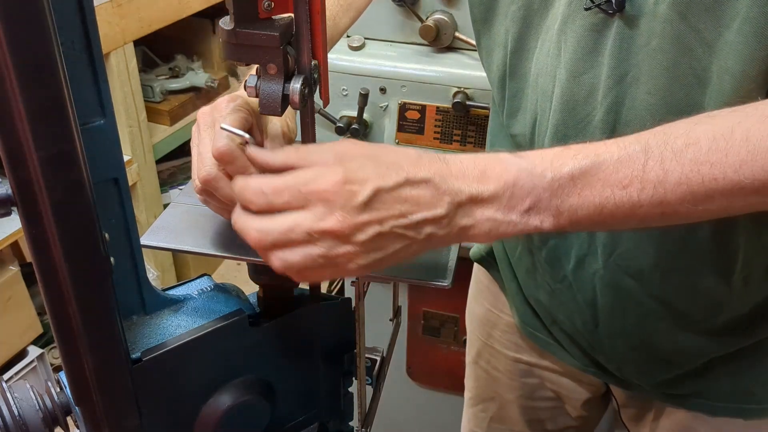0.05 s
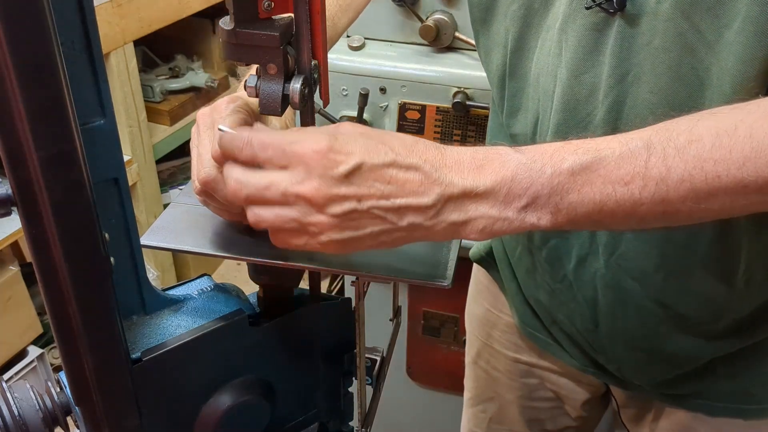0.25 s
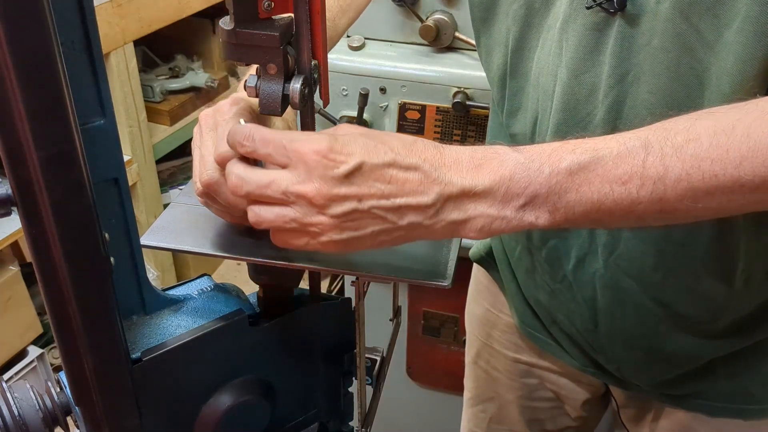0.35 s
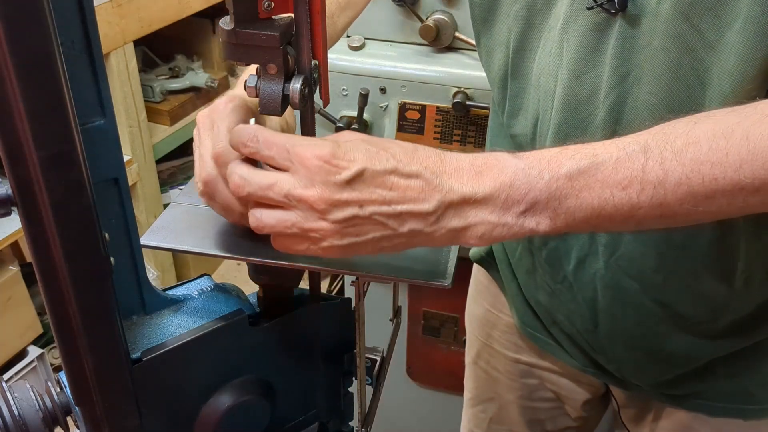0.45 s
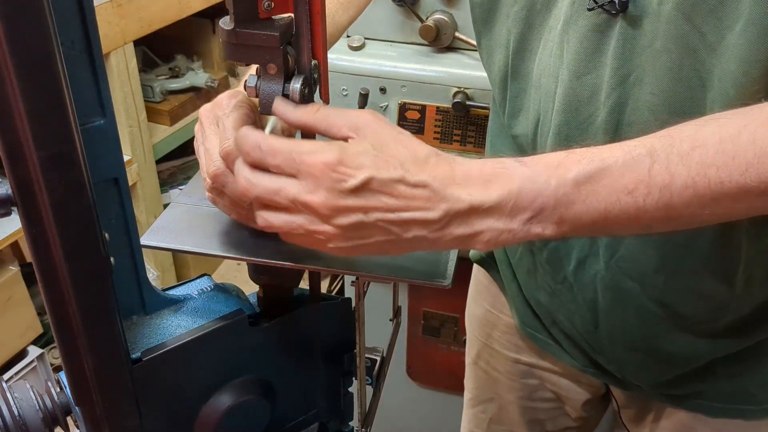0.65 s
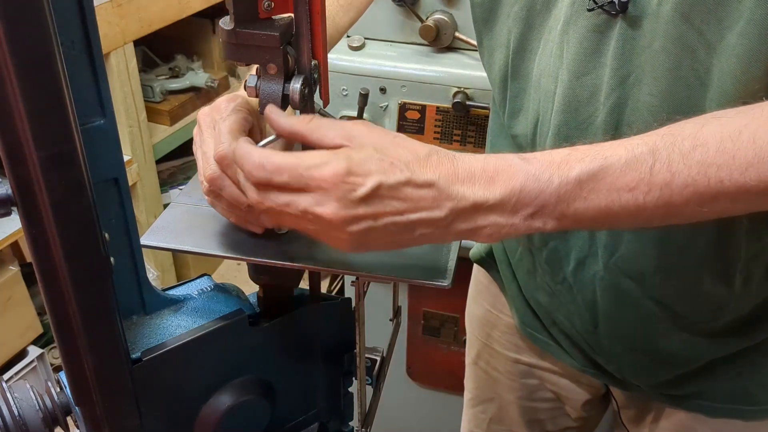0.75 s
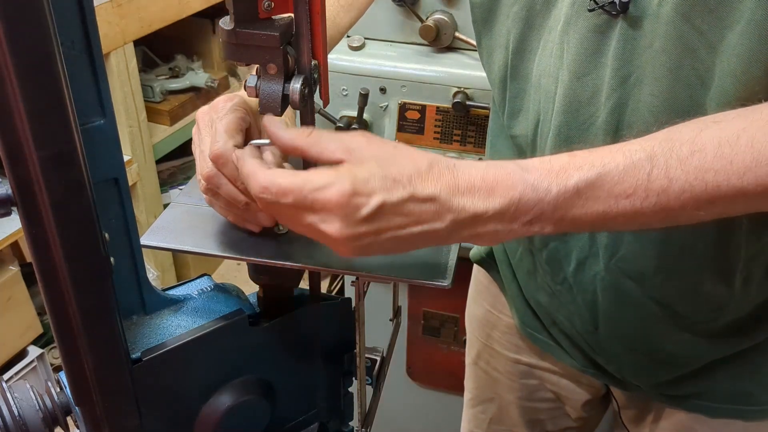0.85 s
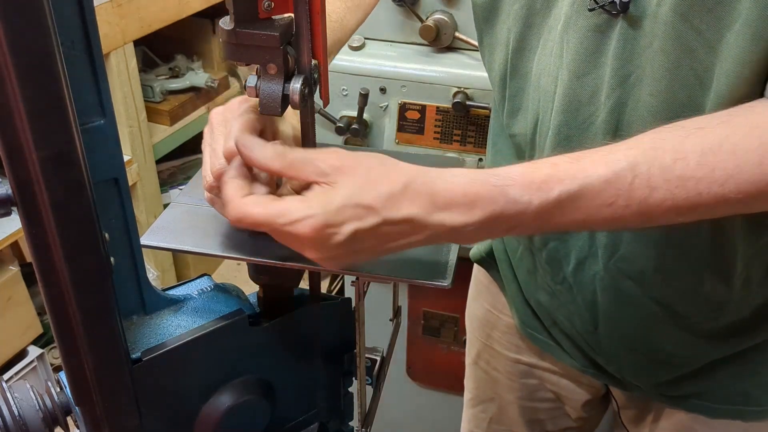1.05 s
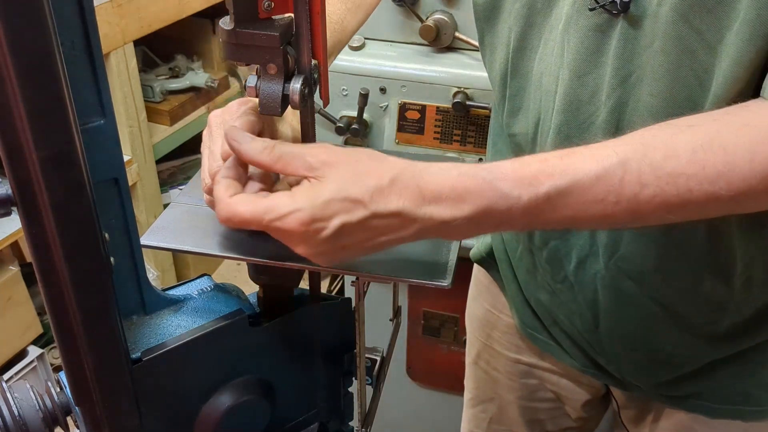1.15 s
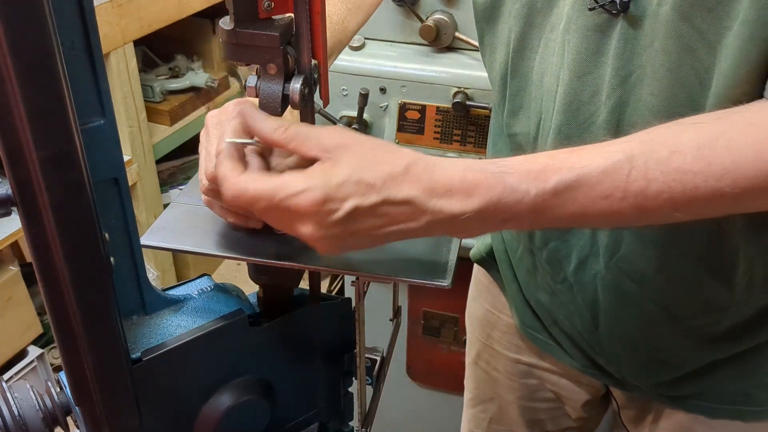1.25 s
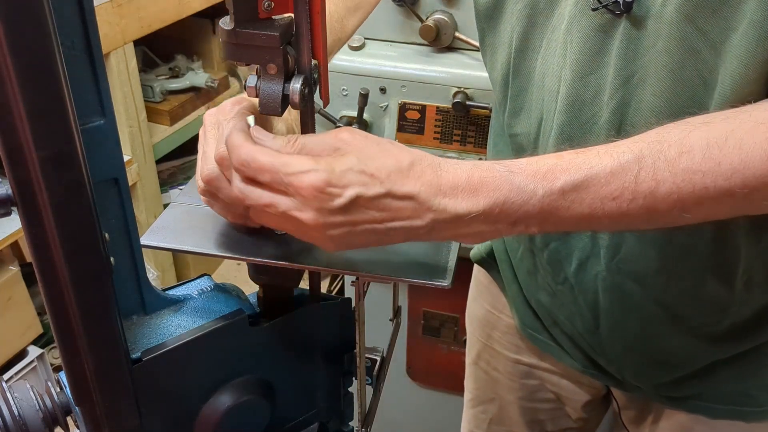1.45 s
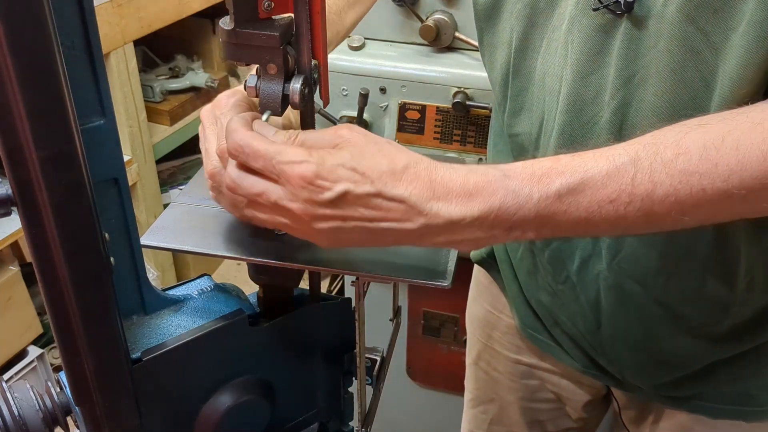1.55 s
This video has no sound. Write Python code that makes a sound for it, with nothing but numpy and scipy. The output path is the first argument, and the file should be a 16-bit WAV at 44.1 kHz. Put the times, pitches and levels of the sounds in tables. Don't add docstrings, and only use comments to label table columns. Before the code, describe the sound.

A thin steel rod clinks and scrapes in a steel plate, close up in a small workshop. Faint scraping opens; near 0.2 seconds a dull bench knock meets a cluster of low microphone thumps, leaving cloth rumble that fades by about 1. A light tick sounds at 0.88. Two hard, bright clinks ring at 1.23 and 1.27 with a hollow boom, then scraping and small taps.

```python
import sys
import numpy as np
from scipy import signal
from scipy.fft import rfft, irfft
from scipy.io import wavfile
from scipy.ndimage import uniform_filter1d

SR = 44100
rng = np.random.default_rng(int(sys.argv[2]) if len(sys.argv) > 2 else 0)


def dump(signal):
    limited = np.clip(np.atleast_2d(signal).T, -1, 1)
    pcm = np.round(limited * 32767).astype(np.int16)
    wavfile.write(sys.argv[1], SR, pcm)


def linear_from_db(decibels):
    return 10 ** (np.asarray(decibels, float) / 20)


N = 70560

ROD_PITCHES = [1125, 1513, 1961, 1983, 2420, 2600, 2929, 3714, 3960, 4660, 4791, 5620, 5803, 6918]
PLATE_PITCHES = [800, 832, 885, 925, 1168, 1210, 1290, 1420, 2420, 2640, 3570, 3720, 3960, 5800]
BENCH_PITCHES = [576, 707, 790, 880, 1163, 1289, 1430, 1507, 1970, 2330, 2422, 2632, 3962]
# level_db, t60_s
ROD_MODES = [(-13.5, 0.13), (-5.5, 0.13), (-3.5, 0.21), (-10.5, 0.61), (-3, 0.12), (-8, 0.17), (-2, 0.16),
             (-18.5, 0.072), (-7, .14), (-13, 0.21), (-5.5, 0.059), (-14.5, 0.18), (-2, .09), (-33, 0.25)]
PLATE_MODES = [(-5.5, 0.15), (6.5, 0.097), (-10.5, 0.22), (-6.5, 0.3), (8.5, 0.062), (-15, .08), (1, 0.086),
               (-10.5, 0.053), (-18.5, 0.089), (-7.5, 0.083), (-21.5, 0.16), (-12, 0.11), (-9, 0.13),
               (-49.5, 0.055)]
BENCH_MODES = [(-16.5, 0.21), (-13, 0.05), (-3, 0.15), (7.5, 0.11), (-8.5, .13), (-3, .15), (-11, 0.065),
               (-11, .1), (-33.5, .2), (-27.5, 0.24), (-19.5, .1), (-22.5, .08), (-47, .08)]
# start_s, rod_db, plate_db, bench_db, crack_db
TAP_EVENTS = [(.003, -86.5, -75, -70.5, -70), (.078, -103, -86, -82.5, -66), (.086, -91.5, -85, -68, -92.5),
              (.196, -92.5, -79, -41, -60), (.807, -100, -83.5, -86, -88),
              (.8396, -94, -54.5, -89.5, -64.5), (.884, -79.5, -44.5, -64.5, -53.5),
              (1.0875, -100, -86.5, -88.5, -85), (1.1688, -106, -87.5, -65.5, -80.5),
              (1.2340, -33.5, -31, -43, -27), (1.2702, -27, -45.5, -64, -21),
              (1.4028, -99.5, -72, -59, -49), (1.526, -82.5, -59.5, -56, -45),
              (1.593, -77, -60.5, -58, -49)]
# frequency_hz, level_db
CRACK_COLOUR = [(250, -38.5), (500, -0.5), (900, 2), (2000, -6), (2800, -1.5), (4500, -9.5), (6000, -12),
                (7300, -36.5)]
# frequency_hz, level_db_per_hz
THUD_COLOUR = [(350, -21.5), (600, -5), (900, -4), (1400, -3.5), (1800, -12), (2500, -23), (4000, -38),
               (5000, -45.5)]
# time_s, friction_db, brightness_db, depth_db
SCRAPE_COURSE = [(0, -81, -4, 2.5), (.09, -63.5, -5.5, 6.5), (.19, -69.5, -3.5, -1), (.3, -80, -23, -0.5),
                 (.495, -94, -22, -16.5), (.515, -69.5, -31, -12), (.56, -68, -39, -8),
                 (.64, -77, -32, -20.5), (.66, -93.5, -36, -26.5), (.79, -100, -33, -24),
                 (.812, -68, 1, -24), (.98, -76, -7.5, -29.5), (1.04, -82, -18, -18.5),
                 (1.07, -67, -13.5, -14), (1.16, -62.5, -12.5, -7.5), (1.22, -57.5, -13, 1),
                 (1.45, -72.5, -9.5, -7.5), (1.6, -59.5, -21, 0)]
# pitch_hz, width_hz, level_db
SCRAPE_RESONANCES = [(599, 90, -5.5), (738.6, 23, 2), (836, 64, -2.5), (916, 29, -7), (1207, 81, -4),
                     (1404, 160, -4.5), (2210, 200, -31), (4230, 150, -41.5)]
# start_s, level_db
PLATE_HUMS = [
    (.2, -74.5),
    (.884, -65),
    (1.06, -85.5),
    (1.16, -77),
    (1.53, -61.5),
]
# start_s, level_db
BENCH_BOOMS = [
    (0.21, -55),
    (.08, -76.5),
    (2.6, -78),
    (1.2597, -46.5),
    (1.53, -84.5),
]
# centre_s, level_db, pitch_hz, length_s, direction (+1 push, -1 pull)
MIC_THUMPS = [
    (.210, -33, 30, 0.0054, 1),
    (0.2306, -16, 85, 0.0056, -1),
    (0.2517, -18, 95, 0.0034, 1),
    (0.2632, -18, 110, 0.0025, 1),
    (0.291, -25.5, 35, 0.013, -1),
    (0.337, -19.5, 70, 0.0041, 1),
    (0.363, -33.5, 65, .015, 1),
    (0.623, -31, 38, 0.011, 1),
    (0.742, -44, 70, 0.0073, -1),
]
# time_s, level_db
RUMBLE_COURSE = [(0.0, -64), (0.114, -78), (0.172, -53), (0.32, -43), (0.378, -42), (0.444, -47.5),
                 (0.708, -48.5), (0.802, -51), (1.068, -65), (1.224, -70), (1.6, -69)]
# frequency_hz, level_db_per_hz
RUMBLE_SPECTRUM = [(18, -2), (30, 2.5), (50, -9), (90, -22), (160, -33), (300, -52.5), (500, -62.5)]
# frequency_hz, t60_s
ROOM_DECAY = [(150, 0.3), (400, 0.37), (1000, 0.24), (3000, 0.2), (7000, 0.18)]


def colour(x, table):
    points = np.array(table, float)
    hz = np.fft.rfftfreq(len(x), 1 / SR) + 1
    level_db = np.interp(np.log(hz), np.log(points[:, 0]), points[:, 1], left=-90, right=-90)
    return irfft(rfft(x) * linear_from_db(level_db), len(x))


def unit(x):
    return x / np.sqrt(np.mean(x ** 2))


def band(x, lo_hz, hi_hz):
    return signal.sosfilt(signal.butter(2, [lo_hz, hi_hz], "band", fs=SR, output="sos"), x)


def curve(table, column):
    points = np.array(table, float)
    return np.interp(np.arange(N) / SR, points[:, 0], points[:, column])


def decay(t, t60_s):
    return np.exp(-np.log(1000) * t / t60_s)


def ring(pitches, modes, contact_s, rattle_db):
    t = np.arange(SR // 2) / SR
    hold = int(SR / 110)
    steps = rng.standard_normal((len(pitches), len(t) // hold + 1))
    flutter = uniform_filter1d(np.repeat(steps, hold, axis=1), hold, axis=1)[:, :len(t)]
    out = np.zeros(len(t))
    for hz, (level_db, t60_s), wobble in zip(pitches, modes, flutter):
        out += linear_from_db(level_db + rattle_db * wobble) * np.sin(2 * np.pi * hz * t) * decay(t, t60_s)
    attack = np.sin(np.pi / 2 * np.minimum(t / contact_s, 1)) ** 2
    return out * attack


def taps():
    hard_db, hard_contact_s, soft_contact_s, bench_contact_s = -40, 0.0012, 0.0022, 0.009
    crack_t60_s, reflection_s, reflection_db = 0.046, 0.0038, -3
    t = np.arange(SR // 2) / SR
    rings = np.zeros(N + SR)
    noise = np.zeros((2, N + SR))
    for start_s, rod_db, plate_db, bench_db, crack_db in TAP_EVENTS:
        soft = int(crack_db < hard_db)
        contact_s = soft_contact_s if soft else hard_contact_s
        rod = linear_from_db(rod_db) * ring(ROD_PITCHES, ROD_MODES, contact_s, 1.0)
        plate = linear_from_db(plate_db) * ring(PLATE_PITCHES, PLATE_MODES, contact_s, 2.0)
        bench = linear_from_db(bench_db) * ring(BENCH_PITCHES, BENCH_MODES, bench_contact_s, 2.0)
        burst = decay(t, crack_t60_s) * np.minimum(t / contact_s, 1)
        first, second = rng.standard_normal((2, len(t))) * burst
        i, late = int(start_s * SR), int((start_s + reflection_s) * SR)
        rings[i:i + len(t)] += rod + plate + bench
        noise[soft, i:i + len(t)] += linear_from_db(crack_db) * first
        noise[soft, late:late + len(t)] += linear_from_db(crack_db + reflection_db) * second
    cracks = linear_from_db(9) * colour(noise[0], CRACK_COLOUR) + linear_from_db(18) * colour(noise[1], THUD_COLOUR)
    return np.array([rings, cracks])[:, :N]


def scrape():
    slips_per_s, slip_spread_db = 1200, 5
    chance, side, size = rng.random((3, N))
    slips = (chance < slips_per_s / SR) * np.sign(side - 0.5) * linear_from_db(-slip_spread_db * np.log(size))
    parts = []
    for hz, width_hz, level_db in SCRAPE_RESONANCES:
        narrow = band(slips, hz - width_hz / 2, hz + width_hz / 2)
        parts.append(linear_from_db(level_db) * unit(band(narrow, hz / 1.4, hz * 0.87)))
    deep = linear_from_db(curve(SCRAPE_COURSE, 3)) * sum(parts[:2])
    middle = sum(parts[2:4])
    bright = linear_from_db(curve(SCRAPE_COURSE, 2) + 9) * sum(parts[4:])
    return linear_from_db(curve(SCRAPE_COURSE, 1)) * (deep + middle + bright)


def swell(events, rise_s):
    out = np.zeros(N)
    for start_s, level_db in events:
        age = np.maximum(np.arange(N) / SR - start_s, 0) / rise_s
        out += linear_from_db(level_db) * age * np.exp(1 - age)
    return out


def plate_hum():
    t = np.arange(N) / SR
    hum_hz, beat_hz = 1962, 15
    pair = np.sin(2 * np.pi * hum_hz * t) + 0.55 * np.sin(2 * np.pi * (hum_hz + beat_hz) * t + 1)
    return swell(PLATE_HUMS, 0.023) * pair


def bench_boom():
    return swell(BENCH_BOOMS, 0.028) * unit(band(rng.standard_normal(N), 230, 540))


def thumps():
    t = np.arange(N) / SR
    out = np.zeros(N)
    for centre_s, level_db, hz, length_s, direction in MIC_THUMPS:
        age = t - centre_s
        pulse = np.cos(2 * np.pi * hz * age) * np.exp(-0.5 * (age / length_s) ** 2)
        out += np.sign(direction) * linear_from_db(level_db) * pulse
    return out


def rumble():
    return linear_from_db(curve(RUMBLE_COURSE, 1)) * unit(colour(rng.standard_normal(N), RUMBLE_SPECTRUM))


def room(x):
    rise_s = 0.0027
    t = np.arange(SR // 2) / SR
    points = np.array(ROOM_DECAY)
    tail = np.zeros(len(t))
    for hz in 150 * 2 ** np.arange(0, 5.6, 0.5):
        t60_s = np.interp(np.log(hz), np.log(points[:, 0]), points[:, 1])
        tail += band(rng.standard_normal(len(t)), hz / 1.159, hz * 1.107) * decay(t, t60_s)
    tail *= 1 - np.exp(-t / rise_s)
    return signal.fftconvolve(x, tail / np.sqrt(np.sum(tail ** 2) * 3))[:N]


def scene():
    rings, cracks = band(taps(), 464, SR / 3)
    rough = cracks + scrape()
    low = thumps() + rumble()
    wet = room(linear_from_db(-20) * rings + linear_from_db(-3.5) * rough + linear_from_db(-29) * low)
    return (rings + rough + plate_hum() + bench_boom() + low + wet)[None]


def roll_off(x):
    return signal.sosfilt(signal.butter(12, 7490, fs=SR, output="sos"), x)


def record(dry):
    narrow = signal.sosfilt(signal.ellip(8, 0.3, 62, 7000, fs=SR, output="sos"), dry)
    mix = narrow + linear_from_db(-92.5) * rng.standard_normal(dry.shape)
    return roll_off(mix)


dry = scene()
out = record(dry)
dump(out)
```